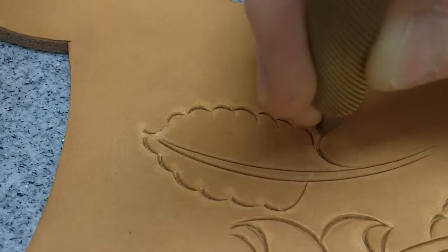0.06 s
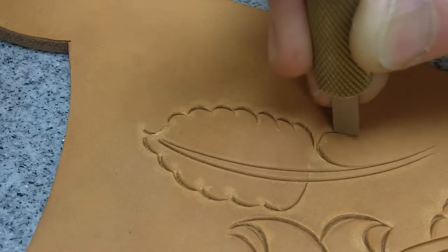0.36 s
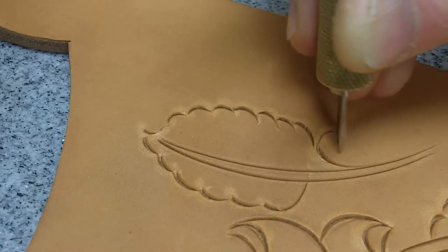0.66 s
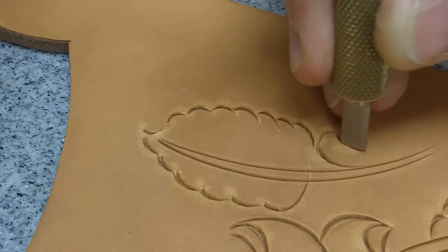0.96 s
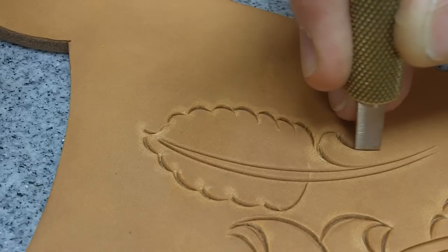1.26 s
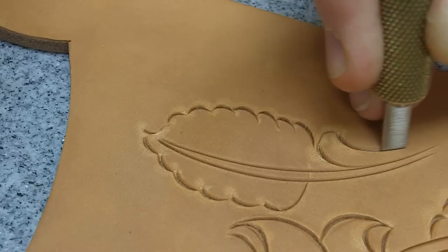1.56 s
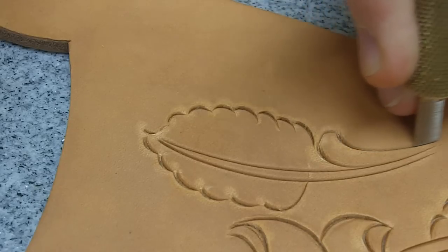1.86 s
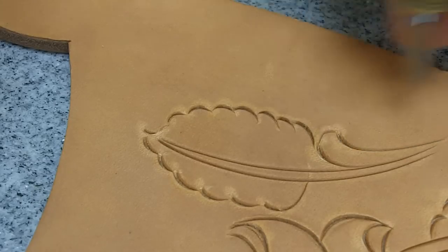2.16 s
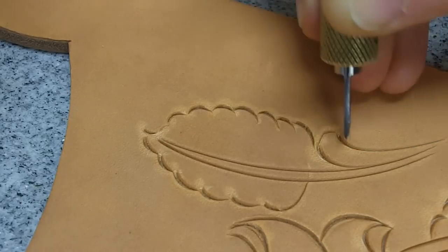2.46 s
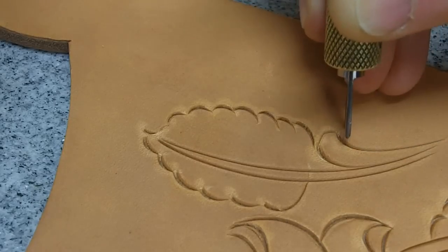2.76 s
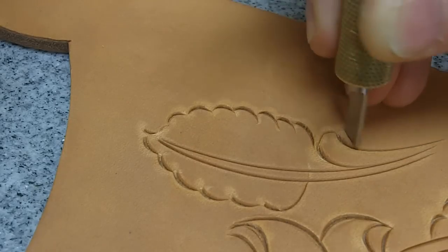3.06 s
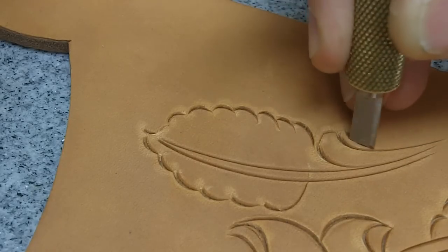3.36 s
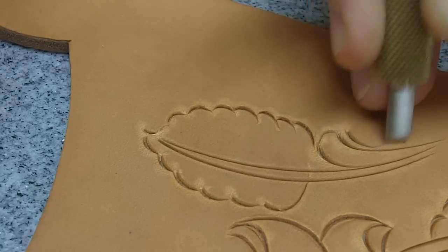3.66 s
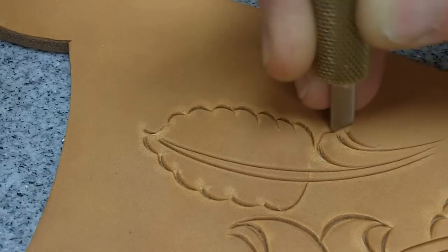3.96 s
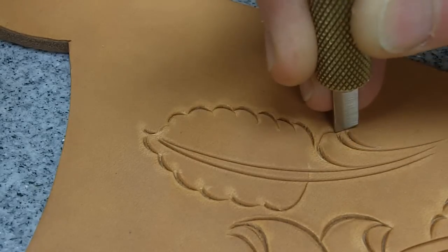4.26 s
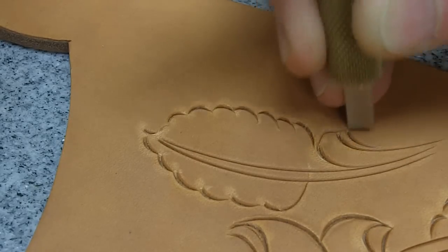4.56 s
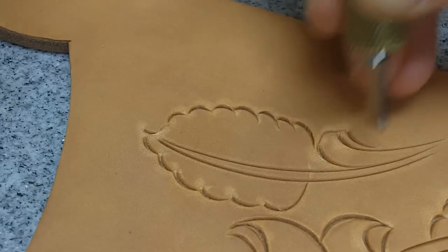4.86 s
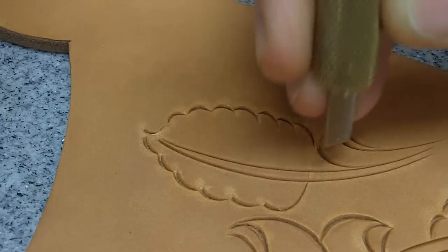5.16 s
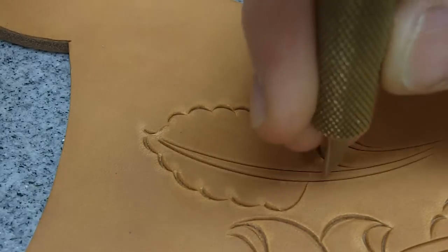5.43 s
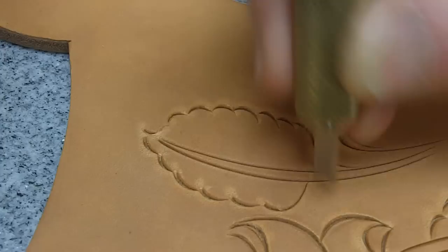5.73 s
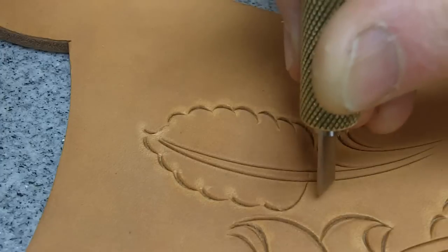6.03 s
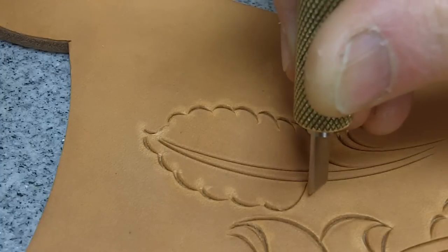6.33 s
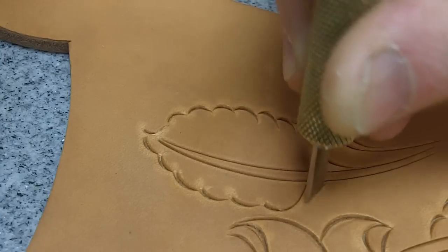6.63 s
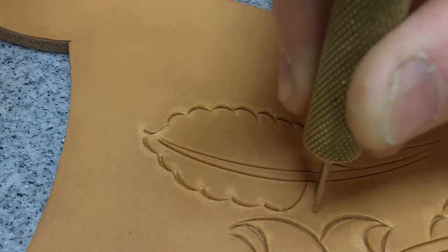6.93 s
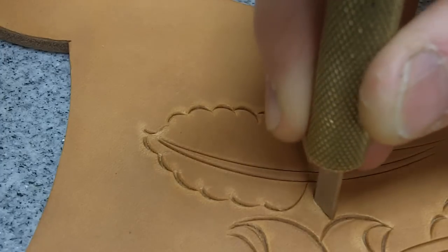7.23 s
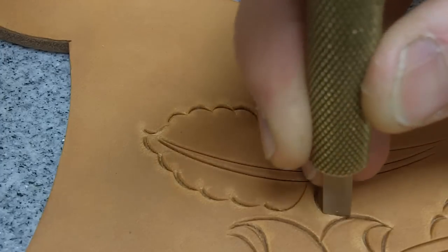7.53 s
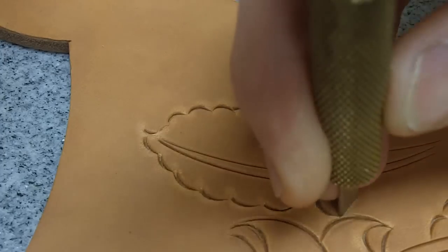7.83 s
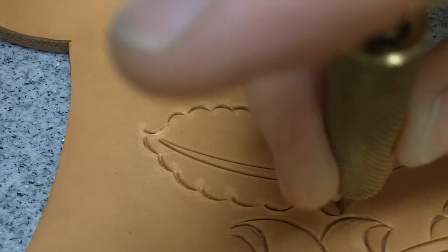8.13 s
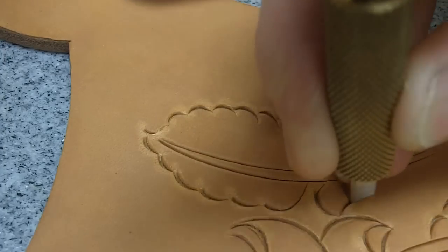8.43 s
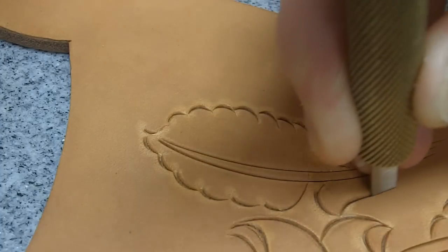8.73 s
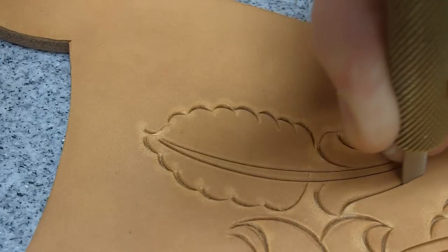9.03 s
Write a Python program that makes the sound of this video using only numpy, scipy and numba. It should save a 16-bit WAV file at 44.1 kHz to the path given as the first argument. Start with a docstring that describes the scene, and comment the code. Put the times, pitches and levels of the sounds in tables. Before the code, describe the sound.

A small knife and the hand holding it move over leather close to the microphone, making soft, brief scuffs and a few tiny ticks. The clearest scrape comes a little after two seconds, and lighter strokes follow at intervals. Behind them, the quiet room holds a steady hiss, muffled traffic and the low hum of an engine outside, which rises in pitch about four seconds in.

```python
"""A quiet room: an engine idles outside, street noise swells through the wall, a camera adds hiss and whine.
From 0.6 s a swivel knife and the hand that holds it scuff and tick over damp leather on a stone slab,
close by and loudest at 2.3 s. At 4.1 s the engine is throttled up, then creeps on as its hum settles.
Light strokes go on until 8.2 s; a last swell of traffic ends the scene."""
import sys
import numpy as np
from scipy import signal
from scipy.fft import rfft, irfft
from scipy.io import wavfile
from scipy.ndimage import map_coordinates
from numba import njit

SR = 44100
rng = np.random.default_rng(int(sys.argv[2]) if len(sys.argv) > 2 else 0)


def master(y):
    """Save y as 16-bit WAV."""
    cut = np.clip(np.atleast_2d(y).T, -1, 1)
    pcm = np.round(cut * 32767)  # scale
    wavfile.write(sys.argv[1], SR, pcm.astype(np.int16))


N = 409688
T = np.arange(N) / SR
FREQS = np.maximum(np.fft.rfftfreq(N, 1 / SR), 1)


def scuffs(slips_per_s=5000, grain_db=0.5, judder_db=0.7, direct_share=0.56,
           rasp_width_hz=1400.0, rasp_sag=0.41, sink_octaves_per_s=4.0):
    """Leather fibres catch and slip by the thousand; each stroke swells and fades with hand speed."""
    # strokes of blade and hand: peak t/s, rise/s, hold/s, fall/s, level/dB, rasp f/Hz, rasp lift/dB
    strokes = [(0.627, 0.0088, 0, .03, -70, 5500, 10), (0.752, 0.027, 0, 0.04, -64.5, 4200, 7),
               (0.971, 0.089, 0, 0.062, -68.5, 6200, 3), (1.018, 0.0055, 0.0043, 0.0093, -66, 3500, 5),
               (1.52, .073, 0.0091, .27, -69.5, 5800, 2), (1.857, 0.0089, 0, 0.046, -70, 2000, 10),
               (2.07, 0.17, 0, .126, -64, 6400, 0), (2.16, 0.056, 0.0019, 0.042, -62, 3700, 4),
               (2.32, 0.059, 0.088, 0.031, -57.5, 5200, 5), (3.174, 0.12, 0, 0.082, -74, 3500, 4),
               (3.332, .06, 0, .056, -68.5, 5500, 3), (3.876, 0.085, 0.003, 0.046, -67.5, 6000, 0),
               (3.961, 0.016, 0, .054, -67, 6500, 3), (4.208, 0.073, 0, 0.041, -75, 3500, 0),
               (4.985, 0.056, 0.0031, .03, -69.5, 3300, 12), (5.051, 0.036, 0.0022, 0.021, -63, 5700, 9),
               (5.832, 0.027, 0.022, 0.036, -64.5, 3200, 8), (6.023, .018, 0, .027, -71, 4000, 8),
               (7.203, 0.021, 0, 0.066, -73, 4500, 3), (7.355, .018, 0, 0.02, -74, 2590, 10),
               (8.201, 0.017, 0, 0.037, -74, 4200, 4)]
    # rubbed leather at the two microphones: f/Hz, left/dB, right/dB, right lag/rad
    leather = [(400, -22, -29, 1.5), (1010, -15, -8, 0.83), (1600, -11, -5, 1.4), (2470, -8, -4.5, 0.53),
               (3360, -7, -3, 0.26), (4000, -9.5, 0.3, 1.93), (5420, -0.5, -4, 1.9), (5700, -4, -4.5, 2.9),
               (6740, -1.5, -6, 5.15), (7950, -8, -8, 3.7), (9500, -20, -15, 6.7), (11900, -12.5, -13, 5.3),
               (14400, -22, -17, 5)]
    slips = (rng.random(N) < slips_per_s / SR) * undb(grain_db * np.minimum(rng.exponential(size=N), 5))
    paths = unit(slips * rng.standard_normal((3, N))) + rng.standard_normal((3, N))
    # direct sound reaches both microphones, reflections differ
    friction = np.sqrt(direct_share) * paths[0] + np.sqrt(1 - direct_share) * paths[1:]
    hz, left_db, right_db, lag_rad = np.transpose(leather)
    friction[1] = irfft(rfft(friction[1]) * np.exp(-1j * np.interp(FREQS, hz, lag_rad)), N)
    rub = colour(friction, np.transpose([hz, left_db, right_db]))
    out = np.zeros((2, N))
    for peak_s, rise_s, hold_s, fall_s, db, rasp_hz, lift_db in strokes:
        span = slice(int((peak_s - 2 * rise_s) * SR), int((peak_s + hold_s + 2 * fall_s) * SR))
        age_s = T[span] - peak_s
        speed = np.exp(-(np.minimum(age_s, 0) / rise_s) ** 2
                       - (np.maximum(age_s - hold_s, 0) / fall_s) ** 2)
        # the rasp follows hand speed and sinks as a held stroke settles into the leather
        centre_hz = rasp_hz * (1 - rasp_sag * (1 - speed))
        centre_hz *= 2 ** (-sink_octaves_per_s * np.clip(age_s, 0, hold_s))
        rasp = np.array([sweep(side, centre_hz, rasp_width_hz) for side in rub[:, span]])
        out[:, span] += undb(db) * speed * unit(rub[:, span] + (undb(lift_db) - 1) * rasp)
    return out * undb(judder_db * walk(70))


def ticks(size=4096):
    """Blade and fingers catch and let go: single slips and soft bumps, damped at once by the leather."""
    # catches: t/s, level/dB, f/Hz, width/Hz, decay/s, ringing share/0-1
    catches = [(0.749, -61, 4600, 5000, .004, 0), (1.061, -68, 4000, 6000, 0.005, 0),
               (1.677, -62, 526, 350, 0.008, 0.5), (1.858, -60.5, 557, 450, 0.014, 0),
               (4.685, -59, 3500, 5000, .0012, 0), (6.222, -67, 2803, 3000, .002, .3),
               (6.661, -57.5, 2630, 3500, 0.0018, 0.3), (7.346, -61.5, 2600, 2500, .003, .4),
               (7.357, -65, 2700, 4000, .004, .1)]
    freqs = np.maximum(np.fft.rfftfreq(size, 1 / SR), 1)
    age_s = T[:size]
    out = np.zeros((2, N))
    for start_s, db, hz, width_hz, decay_s, ring_share in catches:
        crack = unit(irfft(rfft(rng.standard_normal(size)) * band(freqs, hz, width_hz) ** 2))
        ring = np.sqrt(2) * np.sin(2 * np.pi * hz * age_s)
        tick = np.sqrt(1 - ring_share) * crack + np.sqrt(ring_share) * ring
        start = int(start_s * SR)
        out[:, start:start + size] += undb(db) * tick * np.exp(-age_s / decay_s)
    return out * pan(db=-2)


def engine(idle_hz=11.27, sag_hz=0.1605, work_hz=14.11, creep_hz_per_s=0.0425, wobble=0.002,
           throttle_s=4.11, spin_up_s=0.078, load_lead_s=0.25, settle_s=3.2,
           idle_db=-64, work_db=-63, strain_db=7, boom_db=7, waver_db=1.2, flutter_db=1.4):
    """Uneven firings give lines at multiples of the cycle rate; their balance shifts with speed."""
    # engine lines: multiple of cycle rate, slow level/dB, fast level/dB, left minus right/dB
    orders = [(5, -34.5, -7.5, 17), (7, -20, -21, 11), (8, -14.5, -2.5, 16), (9, -12, -6.5, -13),
              (10, -18.5, -27, 19), (11, -4, -14, 15.5), (12, -24, -24, -5), (13, -18, -30, 9),
              (16, -10.5, -29, -6)]
    # swells and dips of the whole hum and of its top line: t/s, half length/s, change/dB
    hum_swells = [(0.0, 0.1, 5.5), (0.55, 0.26, -1.5), (1.47, 0.26, 4.5), (2.146, 0.35, -3),
                  (4.17, 0.04, 3), (4.34, 0.044, -2.5), (4.85, 0.32, 1), (6.25, 0.17, 2.5),
                  (6.9, 0.6, -1.5)]
    top_line_swells = [(0.75, 0.57, 4), (1.95, 0.32, -14), (3.45, 0.28, 4), (4.15, 0.2, -15)]
    fast = ramp(throttle_s, spin_up_s)
    since_s = np.maximum(T - throttle_s, 0)
    slow_hz = (idle_hz - sag_hz * bell(peak_s=3.15, half_s=0.703)) * (1 + wobble * walk(1.46))
    cycle_hz = (1 - fast) * slow_hz + fast * (work_hz + creep_hz_per_s * since_s)
    cycles = np.cumsum(cycle_hz * (1 + wobble * walk(5))) / SR
    load = ramp(throttle_s - load_lead_s, spin_up_s)
    loaded_db = work_db + strain_db * np.exp(-since_s / settle_s)
    hum_db = (1 - load) * idle_db + load * loaded_db + changes(hum_swells)
    out = 0
    for order, slow_db, fast_db, pan_db in orders:
        line = np.sqrt(2) * np.sin(2 * np.pi * (order * cycles + rng.random()))
        line_db = slow_db + fast * (fast_db - slow_db) + waver_db * walk(2.99)
        # a line booms as it sweeps through a room mode
        line_db += boom_db * np.abs(band(order * cycle_hz, hz=105, width_hz=8)) ** 2
        if order == orders[-1][0]:
            line_db += changes(top_line_swells)
        out += line * undb(line_db) * pan(pan_db)
    return out * undb(hum_db + flutter_db * walk(6))


def drone(rest_hz=93.4, sag_hz=12.5, waver_db=2, trim_db=-1):
    """A farther motor sags in pitch and recovers; only one low line comes through the wall."""
    # motor hum: peak t/s, half length/s, level/dB
    hum_swells = [(0.35, 0.22, -61.5), (1.55, 0.4, -71), (2.8, 1.2, -70.5), (8, 3.1, -73.5)]
    hz = rest_hz - sag_hz * bell(peak_s=2.15, half_s=1.7)
    line = unit(np.sin(2 * np.pi * np.cumsum(hz) / SR))
    return line * swells(hum_swells) * undb(trim_db + waver_db * walk(2.85))


def street(far_rumble_db=-82, far_tyre_db=-80.5, reflected=0.57, flutter_db=1):
    """Road rumble and tyre hiss swell over steady distant traffic, muffled by wall and window."""
    # traffic swells: peak t/s, half length/s, rumble/dB, tyre hiss/dB
    traffic = [(0.0, 0.77, -69.5, -90), (1.08, 0.86, -72.5, -78.5), (2.7, 1, -74.5, -78),
               (3.7, 0.76, -91, -70.5), (4.38, 0.85, -68.5, -76), (5.1, 0.67, -73.5, -74.5),
               (5.8, 0.45, -69.5, -78), (8.9, 0.92, -76.5, -75)]
    # wall and window resonances: f/Hz, width/Hz, level/dB
    rumble_modes = [(238, 42, 1), (490, 130, -1), (690, 140, -9.5)]
    tyre_modes = [(787, 92, 1), (906, 110, -1), (1060, 130, -2.5), (1250, 140, -7), (1800, 300, -7.5)]
    rumble_gain, tyre_gain = swells(traffic)
    noise = diffuse(likeness=0.34, corner_hz=1450)
    rumble = resonate(noise + reflected * room(noise), rumble_modes)
    noise = diffuse(likeness=0.47, corner_hz=2000)
    tyres = resonate(noise + reflected * room(noise), tyre_modes)
    rumble *= np.hypot(rumble_gain, undb(far_rumble_db)) * undb(flutter_db * walk(9))
    tyres *= np.hypot(tyre_gain, undb(far_tyre_db)) * undb(flutter_db * walk(9))
    return rumble * pan(db=5) + tyres * pan(db=3)


def rushes():
    """Brief hollow swells of street noise, each with its own pitch."""
    # noise bands: peak t/s, half length/s, f/Hz, width/Hz, level/dB
    bands = [(0.95, 0.23, 770, 50, -75), (1.87, 0.076, 500, 110, -74), (4.35, 0.18, 400, 160, -76),
             (5.28, 0.09, 980, 90, -74), (5.73, 0.15, 760, 140, -72.5), (8.3, 0.4, 560, 140, -76.5)]
    noise = diffuse(likeness=0.32, corner_hz=1480)
    out = 0
    for peak_s, half_s, hz, width_hz, db in bands:
        out += resonate(noise, [(hz, width_hz, 0)]) * bell(peak_s, half_s) * undb(db)
    return out * pan(db=3)


def far_tones(blur_hz=12, echo_gain=0.5):
    """Faint tones drift in from outside, most of them gliding; echoes blur each a little."""
    # tones: peak t/s, half length/s, f/Hz, glide/(Hz/s), level/dB
    tones = [(0.413, 0.3, 148.3, -2.5, -70), (1.45, 0.5, 567.6, 0, -78.5),
             (2.117, 0.42, 134.7, 13.5, -70.5), (2.85, 0.25, 295, 45.5, -75)]
    out = 0
    for peak_s, half_s, hz, glide_hz_per_s, db in tones:
        phase = 2 * np.pi * np.cumsum(hz + glide_hz_per_s * (T - peak_s)) / SR
        echoes = np.array([blurred(phase, blur_hz) for _ in range(2)])
        out += unit(np.sin(phase) + echo_gain * echoes) * bell(peak_s, half_s) * undb(db)
    return out * pan(db=3)


def whirr(tone_blur_hz=20, octave_blur_hz=130, spread=0.59, trim_db=-1):
    """A distant machine's tone blurs into a narrow band on its way in, its octave into a soft rush."""
    # pitch, set by machine speed: t/s, f/Hz
    pitch = [(0, 480), (0.8, 502), (1.6, 503), (2.3, 490), (4.3, 468), (5.3, 469.5), (6.6, 492.6)]
    # whirr swells: peak t/s, half length/s, tone/dB, octave/dB
    whirr_swells = [(0.95, 0.75, -76.5, -98), (1.9, 0.15, -74, -75.5), (3.7, 0.39, -79.5, -74.5),
                    (4.33, 0.12, -73, -91), (5.2, 0.4, -76.5, -74.5), (6.4, 0.75, -82.5, -87)]
    phase = 2 * np.pi * np.cumsum(np.interp(T, *np.transpose(pitch))) / SR
    tone_gain, octave_gain = swells(whirr_swells)
    out = 0
    for multiple, gain, blur_hz in (1, tone_gain, tone_blur_hz), (2, octave_gain, octave_blur_hz):
        mid = blurred(multiple * phase, blur_hz)
        side = spread * blurred(multiple * phase, blur_hz)
        out += gain * np.array([mid + side, mid - side])
    return out * undb(trim_db) * pan(db=3)


def throb(rate_hz=2.98, crest_s=7.25, centre_hz=250, width_hz=130, crest_db=-75):
    """A faint low whoosh three times a second, as from the blades of a slow fan."""
    swing = (1 + np.cos(2 * np.pi * rate_hz * (T - crest_s))) / 2
    whoosh = resonate(diffuse(likeness=0.16, corner_hz=1000), [(centre_hz, width_hz, 0)])
    return whoosh * swing * undb(crest_db) * pan(db=3)


def air(drift_db=0.35):
    """Steady room noise under smooth microphone hiss."""
    # noise density in a 1 Hz band: f/Hz, left/dB, right/dB
    density = [(19.3, -81.5, -91), (53.6, -86.5, -97.5), (103, -83.5, -86), (189, -90.5, -95),
               (290, -96.5, -99), (674, -101, -102.5), (950, -100, -101), (1310, -103.3, -103.3),
               (2340, -106.2, -106), (4200, -109, -108.7), (6500, -110.6, -111), (9200, -112.2, -112.2),
               (12760, -113.3, -113.3), (13800, -119, -119)]
    noise = diffuse(likeness=0.21, corner_hz=2720) * np.sqrt(SR / 2)
    return colour(noise, density) * undb(drift_db * walk(1.973))


def whine(frame_hz=29.97, steady_hz=7866.5, steady_db=-93.5):
    """Camera electronics: two thin tones restart with every frame, a third holds."""
    # gated tones: f/Hz, level/dB, share of frame/0-1
    tones = [(5465, -85.5, 0.55), (3043, -92.5, 0.54)]
    age_s = T % (1 / frame_hz)
    out = undb(steady_db) * unit(np.sin(2 * np.pi * steady_hz * T))
    for hz, db, share in tones:
        gate = np.sqrt(np.abs(np.sin(np.pi * np.minimum(age_s * frame_hz / share, 1))))
        out += undb(db) * unit(gate * np.sin(2 * np.pi * hz * age_s))
    return out


def room(x, decay_s=0.05):
    """Dense reflections comb the spectrum into fine peaks and dips."""
    age_s = T[:SR // 4]
    reflections = rng.standard_normal((1, len(age_s))) * np.exp(-age_s / decay_s)
    return unit(signal.fftconvolve(x, reflections)[:, :N])


def diffuse(likeness, corner_hz):
    """Stereo white noise, partly alike on both sides below the corner."""
    shared = likeness / (1 + (FREQS / corner_hz) ** 2)
    noise = rfft(rng.standard_normal((3, N)))
    return irfft(np.sqrt(shared) * noise[0] + np.sqrt(1 - shared) * noise[1:], N)


def blurred(phase, blur_hz):
    """A tone whose amplitude and phase wander."""
    return walk(blur_hz) * np.cos(phase) + walk(blur_hz) * np.sin(phase)


def colour(x, table):
    """Filter by a spectrum of (f/Hz, left/dB, right/dB) rows."""
    hz, *sides = np.transpose(table)
    gains = undb([np.interp(np.log(FREQS), np.log(hz), db) for db in sides])
    return irfft(rfft(x) * gains, N)


def band(freqs, hz, width_hz):
    """Response of one resonance, gain 1 at its centre."""
    return 1 / (1 + 1j * (freqs ** 2 - hz ** 2) / (freqs * width_hz))


def resonate(x, modes):
    """Filter by (f/Hz, width/Hz, level/dB) resonances that add in power; output rms 1."""
    power = sum(np.abs(undb(db) * band(FREQS, hz, width_hz)) ** 2 for hz, width_hz, db in modes)
    return unit(irfft(rfft(x) * np.sqrt(power), N))


@njit
def sweep(x, hz, width_hz):
    """State-variable resonance with a moving centre, gain 1 there."""
    out = np.empty(len(x))
    band_state, low_state = 0., 0.
    for i in range(len(x)):
        tuning = np.tan(np.pi * hz[i] / SR)
        damping = width_hz / hz[i]
        bandpass = (band_state + tuning * (x[i] - low_state)) / (1 + tuning * (tuning + damping))
        band_state = 2 * bandpass - band_state
        low_state += 2 * tuning * bandpass
        out[i] = damping * bandpass
    return out


def walk(rate_hz):
    """Smooth random wander, rms 1."""
    knots = rng.standard_normal(int(N / SR * rate_hz) + 4)
    return unit(map_coordinates(knots, [T * rate_hz], order=2, mode="nearest"))


def bell(peak_s, half_s):
    """Gaussian rise to 1 and fall."""
    return np.exp(-((T - peak_s) / half_s) ** 2)


def ramp(mid_s, rise_s):
    """Smooth step from 0 to 1."""
    return (1 + np.tanh((T - mid_s) / (2 * rise_s))) / 2


def swells(table):
    """Gain over time per level column of (t/s, half length/s, level/dB, ...) rows, added in power."""
    power = sum((undb(dbs)[:, None] * bell(peak_s, half_s)) ** 2 for peak_s, half_s, *dbs in table)
    return np.sqrt(power)


def changes(table):
    """Level change in dB over time from (t/s, half length/s, change/dB) rows."""
    return sum(db * bell(peak_s, half_s) for peak_s, half_s, db in table)


def pan(db):
    """Stereo gains, mean 1, for a left minus right level."""
    gains = undb([[db / 2], [-db / 2]])
    return gains / gains.mean(axis=0)


def undb(db):
    """Decibels to gain."""
    return 10 ** (np.asarray(db) / 20)


def unit(x):
    """Scale to rms 1."""
    return x / np.sqrt(np.mean(x ** 2))


def scene():
    """Knife work in front, street and room behind."""
    knife = scuffs() + ticks()
    outside = engine() + drone() + street() + rushes() + far_tones() + whirr()
    return knife + outside + throb() + air() + whine()


def record(dry, top_hz=14600):
    """The camera cuts the top; its converter rests slightly off zero."""
    # converter offset: left/full scale, right/full scale
    offset = [0.0176, 0.0062]
    top_cut = signal.ellip(10, .2, 70, top_hz, fs=SR, output="sos")
    return signal.sosfilt(top_cut, dry) + np.array(offset)[:, None]


dry = scene()
out = record(dry)
master(out)
```